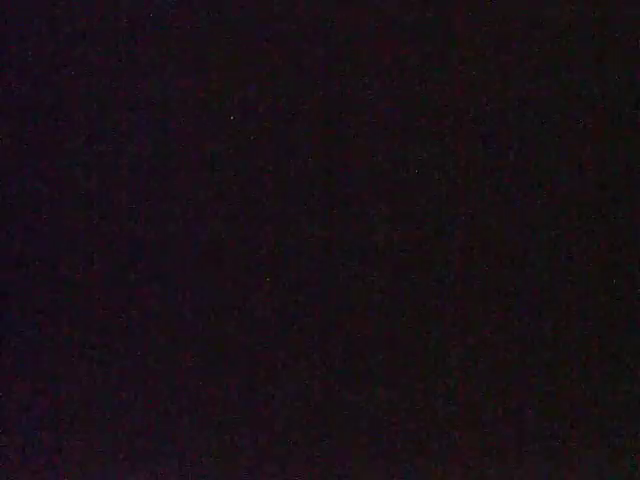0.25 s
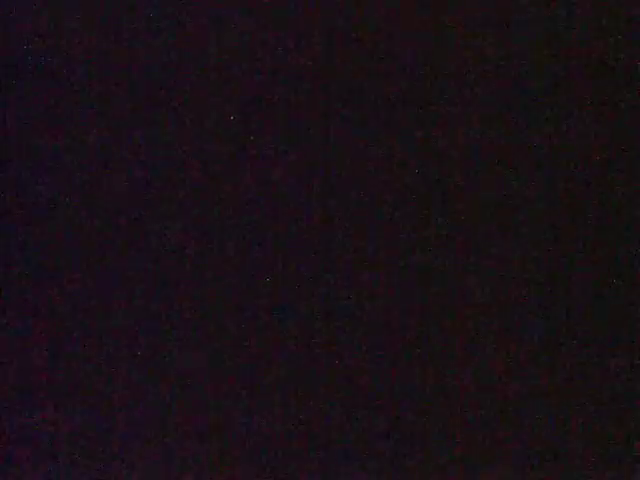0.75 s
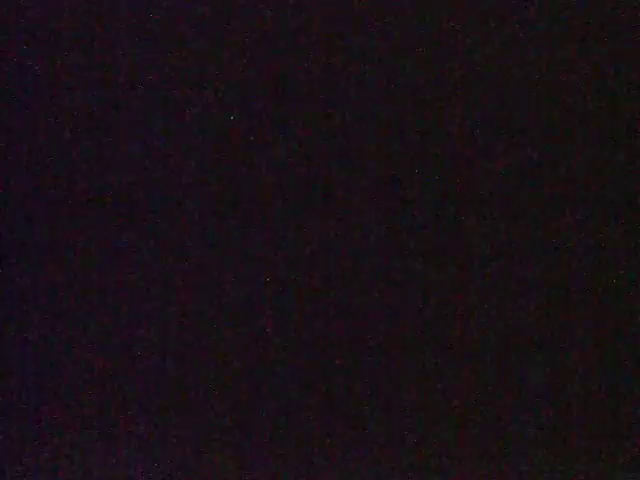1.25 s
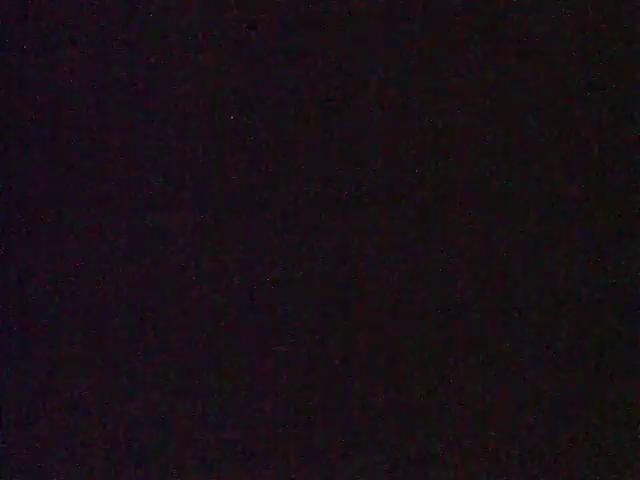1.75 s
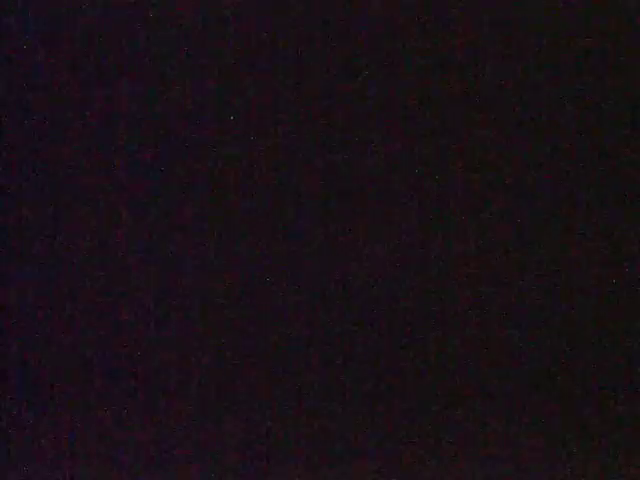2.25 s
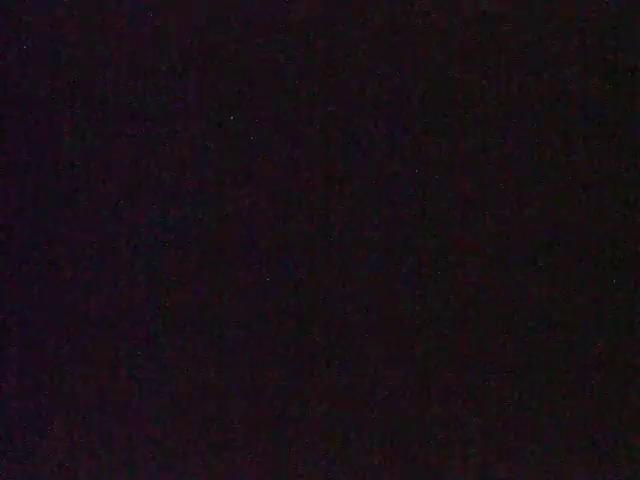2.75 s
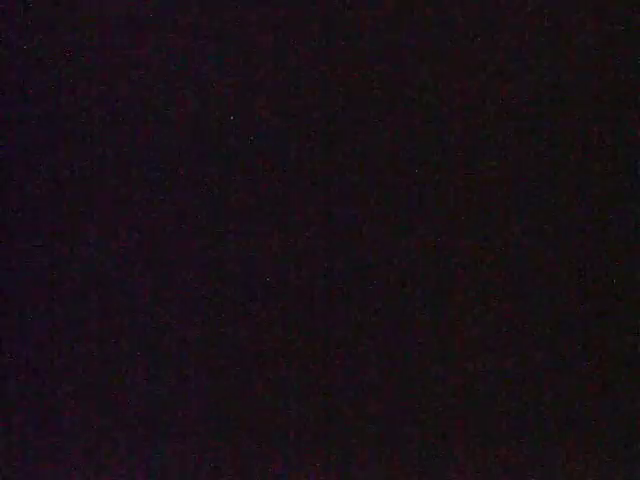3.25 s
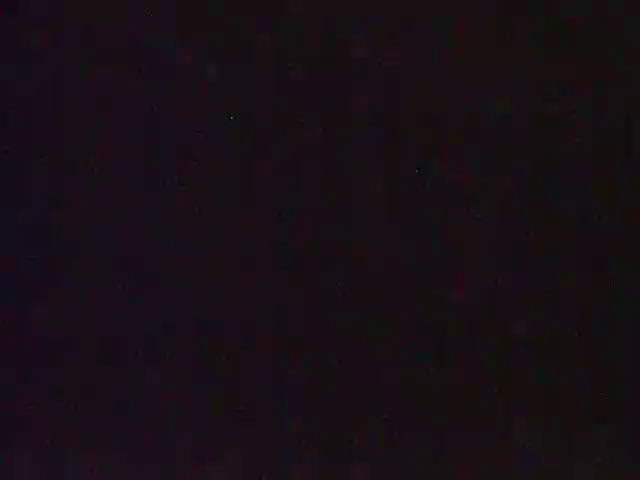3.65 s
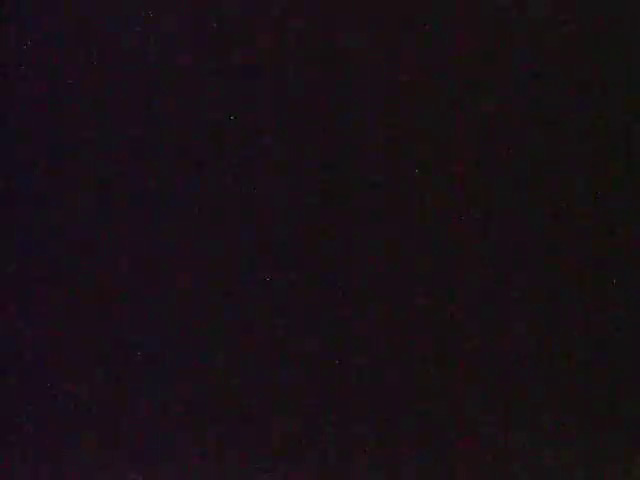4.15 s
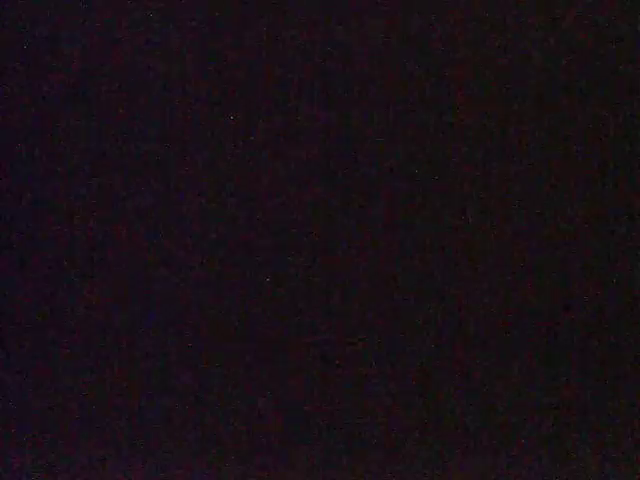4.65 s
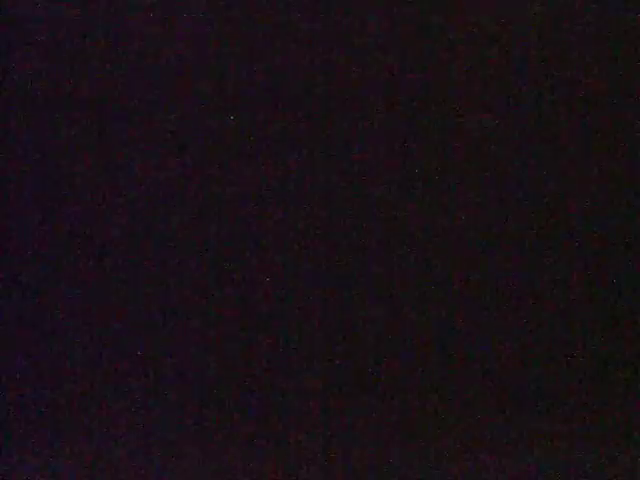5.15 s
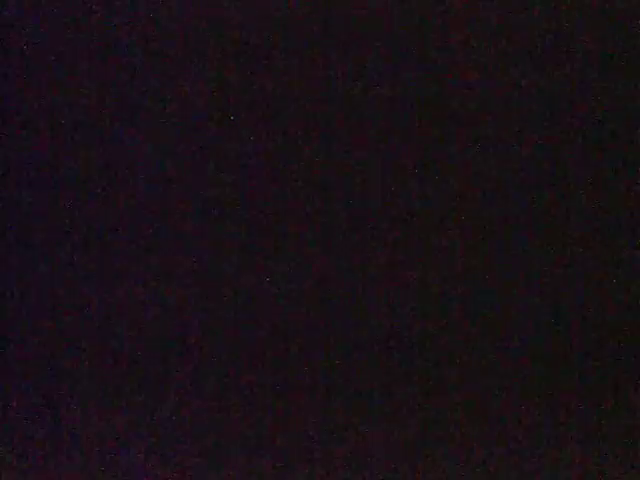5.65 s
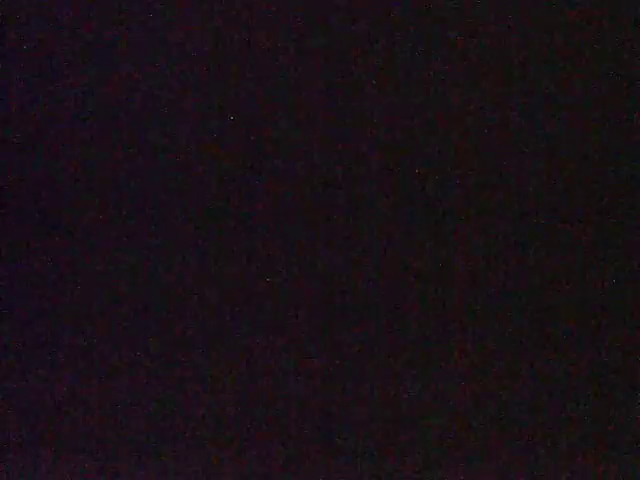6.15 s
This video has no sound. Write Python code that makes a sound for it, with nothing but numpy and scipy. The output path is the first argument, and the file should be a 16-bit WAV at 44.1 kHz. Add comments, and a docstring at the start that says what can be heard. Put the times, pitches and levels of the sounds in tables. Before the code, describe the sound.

Tree frogs whistle two-note calls over a distant night chorus and insect buzz, while fingers rub and click on the recorder's plastic case.

```python
"""Tree frogs whistle through the night: one close by gives a low note, then a high one, over a far crowd
among leaves, buzzing insects and a soft rumble. From half a second in, fingers rub the plastic case of a
handheld recorder; soon they bump and click on it too, ringing its modes, busiest from 2 to 4 s. Near 5 s a
far hum swells and the sharpest click overloads the converter. A last rub and a few clicks come around 6 s."""
import sys
import numpy as np
from scipy import signal
from scipy.fft import rfft, irfft, next_fast_len
from scipy.io import wavfile
from scipy.ndimage import uniform_filter1d

SR = 44100
rng = np.random.default_rng(int(sys.argv[2]) if len(sys.argv) > 2 else 0)


def int16_out(signal):
    """Quantize to a 16-bit WAV file."""
    q = np.round(np.clip(np.atleast_2d(signal).T, -1, 1) * 32767)
    wavfile.write(sys.argv[1], SR, q.astype(np.int16))


N = 282945

# The lead frog's calls. Each row: start in seconds, low note level in dB, high note level in dB,
# swell of the high note in dB, its length in seconds.
NEAR_CALLS = [(-.172, -30, -29, 3.5, 0.12), (.595, -30, -29, 1.5, 0.14), (1.441, -28.5, -36, 3, 0.16),
              (2.228, -30, -41.5, 17.5, 0.15), (3.109, -35, -31, 1.5, 0.14), (3.913, -33, -38, 8.5, 0.14),
              (4.694, -51, -31.5, -8, .15), (5.479, -41.5, -32.5, -9.5, 0.15), (6.357, -38, -38, 0, .16)]
# Frogs behind the leaves. Each row: start and length in seconds, pitch and rise in Hz, level in dB.
HIDDEN_NOTES = [(.019, .114, 3671, 0, -41), (.087, .126, 3757, 0, -43), (.145, .137, 3681, -15, -47),
                (.392, .08, 2031, 0, -45), (.398, .111, 3940, 0, -43), (.505, .094, 3718, 0, -47),
                (.577, .123, 3738, 0, -45), (.632, .087, 3900, 150, -44), (.836, .1, 3656, 0, -43),
                (1.077, .08, 2000, 28, -45), (1.138, .259, 3763, 12, -43), (1.207, .14, 3653, 0, -45),
                (1.44, .105, 3939, 13, -46), (1.651, .063, 2002, 19, -47), (1.663, .19, 3529, 0, -41),
                (1.738, .187, 3664, 0, -43), (1.762, .108, 3940, -11, -45), (1.797, .086, 2028, 0, -44),
                (2.144, .161, 3765, 0, -40), (2.223, .094, 3568, 0, -46), (2.615, .158, 3650, 14, -44),
                (2.712, .177, 3928, 0, -47), (2.922, .197, 3920, 20, -48), (2.766, .105, 3607, 19, -47),
                (3.108, .161, 3768, 0, -43), (3.434, .117, 3454, 30, -42), (3.439, .329, 3602, 64, -44),
                (3.451, .069, 2024, 10, -44), (3.512, .172, 3735, 0, -45), (3.674, .105, 3923, -15, -47),
                (3.805, .102, 3743, 0, -44), (3.942, .097, 3900, 130, -49), (4.121, .137, 3775, 0, -46),
                (4.255, .091, 3787, -15, -47), (4.461, .187, 3656, 0, -45), (4.5, .11, 2790, -40, -56),
                (5.34, .08, 2830, -70, -57), (4.638, .187, 3524, 24, -47), (4.712, .097, 3880, 20, -49),
                (5.076, .161, 3785, 0, -46), (5.242, .112, 2030, 0, -50), (5.448, .108, 3666, 0, -46),
                (5.596, .123, 3545, 16, -47), (5.904, .149, 3786, 9, -45), (6.319, .123, 3660, 0, -43)]
# Clicks and bumps. Each row: start in seconds, thud peak in dB, ring peak in dB, strongest pitch in
# octaves above 1 kHz, fall away from that pitch in dB per octave, crack decay time in milliseconds.
CASE_HITS = [(1.2185, -47, -26, 3, 14, 5), (1.2922, -46, -35, 2.5, 8, 1.9),
             (2.2816, -23.5, -16, 0.6, 22, 0.86), (2.3682, -30, -37, -4, -1.5, .6),
             (2.384, -32, -24, -1.2, 21, 0.88), (2.447, -30.5, -25, 0.5, 18, 0.54),
             (2.4711, -16, -26, 0.6, 4.5, 0.65), (2.5223, -30.5, -4, 2.5, 9, 0.3),
             (2.8852, -30.5, -4.5, 0.83, 7, 1.4), (3.3644, -11.5, -17.5, 0.5, 0, 2.65),
             (3.7029, -23, -29.5, 0, 4, 0.68), (3.8489, -31, -21, 1.1, 7.5, 0.41),
             (3.8599, -36.5, -11, 1.5, 6, 1.3), (3.8834, -54, -30, 1.0, 6, .6),
             (4.14, -54, -20, 2.16, 4.5, 1.1), (4.16, -52, -20, 4, 8, 3.2),
             (4.3391, -53, -10.5, 0.93, 6.5, 0.12), (4.3673, -50, -18.5, 4.5, 5, 8),
             (4.8906, -22, 0, 1.69, 10, 0.11), (4.9319, -51, -30.5, 2.2, 5, 4.3),
             (5.1473, -40, -32.5, 3.5, 0, 0.3), (5.5073, -43, -20.5, 2.5, 7.5, 0.12),
             (6.064, -33, -34, 1.3, 6, 2.5), (6.1204, -32, -22, 6, 2.5, 0.9),
             (6.133, -57, -37, 2.5, 2, 1.7), (6.202, -47, -20, 3, 12, 0.86),
             (6.241, -58, -15.5, 2, 16, 2.3), (6.3042, -52, -18.5, 3, 11.5, 5.3)]
# Modes of the case, grouped as thud, knock, clack, rap, crack, snap, tap and tick.
# Each row: pitch in Hz, level within the group in dB, time to fall 60 dB in seconds.
CASE_MODES = [
    [(111, -16.5, 0.041), (235, 4.5, 0.021), (320, -11, 0.034)],
    [(654, 0, 0.023)],
    [(1074, 2.5, 0.022), (1292, 8.5, 0.014)],
    [(1654, 0, 0.006)],
    [(2120, 0, 0.0044)],
    [(2887, 0, 0.0052)],
    [(3750, 2, 0.0057), (4290, -2, 0.0068)],
    [(5760, -1.5, 0.0033), (6450, -4, 0.0031), (7000, -10.5, 0.012)],
]
# How readily each group from knock to tick answers a blow, in dB.
MODE_RESPONSE_DB = [0, 3, -0.5, -2, -1, -4.5, 5]
# Finger slides, one curve per rub. Each row: time in seconds, level in dB, then the low ring and
# the treble against that level in dB.
RUB_CURVES = [
    [(.43, -64, 19, -7), (.486, -49.5, 5.5, 2.5), (.53, -53.5, 7, 1), (.56, -60, 23, 3)],
    [(.6, -61, 18, -7), (.678, -45.5, -3, 3.5), (.72, -48.5, 9.5, 4.5), (.784, -67.5, 18.5, 4),
     (.912, -54.5, 10, 2.5), (.95, -66, 3, -2)],
    [(.93, -63, -2, -3), (.996, -49, 5.5, -0.5), (1.052, -46.5, -1, -1), (1.194, -50, -3, -6),
     (1.25, -59, 5.5, 1), (1.296, -48, 5.5, -4), (1.33, -60, 15, -6)],
    [(1.33, -56, 11, -5), (1.412, -52.5, 12, 0), (1.494, -37.5, 3.5, -1.5), (1.578, -42, 5, 0.5),
     (1.7, -47.5, 13.5, 3.5), (1.716, -40.5, 3, 2), (1.848, -41.5, 0.5, -6), (1.954, -41, -5, -8),
     (2.02, -54, 11, -9)],
    [(2.19, -57.5, 1, -7), (2.242, -39.5, 3.5, -8), (2.288, -40.5, 16.5, 1), (2.314, -37.5, -4, -5.5),
     (2.416, -52, 13.5, 0), (2.45, -71, 14, -4)],
    [(2.906, -69, 20, -8), (2.938, -62, 22.5, -14), (2.988, -75, 25, -7)],
    [(3.12, -67.5, 27, 2), (3.186, -43, 12, -4), (3.24, -56, 4, -11)],
    [(3.26, -52, 1, -8), (3.302, -41.5, 3.5, -6), (3.348, -37.5, -11, 3.5), (3.394, -39, -9, 0.5),
     (3.458, -37, -10, 2), (3.508, -52, 14.5, 4.5), (3.64, -50, -7, -10), (3.68, -64, 10, 8)],
    [(3.76, -65, 5, 9), (3.796, -47, -4, -2.5), (3.84, -48, 3, -11)],
    [(4.91, -78, 0, -2), (4.93, -44, 8, 9), (4.954, -50, 5, 3), (4.97, -56, 11, -6)],
    [(6.045, -82, 8, -8), (6.06, -58, 14, -10), (6.092, -66, 9, 2), (6.13, -37.5, 6.5, -6),
     (6.15, -72, 4, -6)],
]
# Resonances a rub brings out, grouped as low ring, body, low middle, middle and treble.
# Each row: centre in Hz, width in Hz, level within the group in dB.
RUB_BANDS = [
    [(305, 197, -11), (641, 676, 7)],
    [(1264, 1060, 0)],
    [(2390, 590, 0)],
    [(2826, 980, 8), (3840, 580, -15.5)],
    [(6320, 2080, 9.5), (7170, 1200, 9.5)],
]
# A far frog's two notes. Each row: pitch in Hz, its spread in Hz, length in seconds, relative level in dB.
CROWD_CALL = [(2000, 73.1, .075, -4.5), (3661, 170, 0.101, -2)]
# Fader ride of the far crowd. Each row: time in seconds, level in dB.
CROWD_FADER = [(0, -41), (.23, -41), (.77, -42.5), (1.05, -43.5), (1.6, -40), (2.14, -40.5), (2.9, -45.5),
               (3.4, -42.5), (3.84, -44), (4.23, -43), (4.75, -44.5), (5.0, -47.5), (5.65, -46.5),
               (6.42, -45)]
# Fader ride of the insect buzz. Each row: time in seconds, level in dB.
BUZZ_FADER = [(0, -48), (.44, -49.5), (1.4, -54), (2.05, -52.5), (3.0, -54), (3.7, -53), (4.4, -56.5),
              (5.04, -48), (5.53, -50.5), (5.95, -45), (6.42, -45.5)]
# Cricket pips. Each row: start in seconds, peak in dB.
CRICKET_PIPS = [(.731, -37), (.75, -43), (.76, -49), (.807, -41), (2.819, -50), (2.846, -48), (4.98, -47.5),
                (4.99, -45)]
# Fader ride of a far, engine-like hum. Each row: time in seconds, level in dB.
HUM_FADER = [(0, -49.5), (.75, -51.5), (2.159, -56.5), (2.43, -46.5), (2.79, -55.5), (3.5, -55.5),
             (3.86, -45.5), (4.3, -51), (4.55, -55), (4.77, -42.5), (5.16, -54), (6.42, -57)]
# Tone curve of the rumble and air. Each row: frequency in Hz, relative level in dB.
AIR_SPECTRUM = [(12, -35), (22, -1), (86, -6), (250, -11.5), (650, -15.5), (950, -13.5), (1500, -20.5),
                (2600, -27), (4500, -27), (6200, -26.5), (7800, -22), (9200, -32)]


def near_frogs():
    """The lead frog sings a steady low note, then a scooped high one; notes from behind leaves flutter."""
    low_hz, high_hz, sag_hz, high_delay_s = 1950, 3636, 17, .097
    low, high, hidden = np.zeros((3, N))
    for start, low_db, high_db, swell_db, length in NEAR_CALLS:
        low_phase, high_phase = 2 * np.pi * rng.random(2)
        add(low, start, whistle(.086, low_hz, low_db, low_phase, swell_db=-2))
        note = whistle(length, high_hz, high_db, high_phase, -sag_hz, swell_db, scoop=.045)
        add(high, start + high_delay_s, note)
    for start, length, hz, rise_hz, db in HIDDEN_NOTES:
        phase = 2 * np.pi * rng.random()
        add(hidden, start, whistle(length, hz, db, phase, rise_hz, scoop=.008, blur_s=.02))
    hidden *= undb(2.2 * walk(55) - 1.3)
    high *= undb(2.8 * walk(35) - 2.5)
    low *= undb(1.8 * walk(40) + .8)
    voices = low + high + hidden
    return voices + undb(-11) * foliage(voices, t60=.63)


def whistle(length, hz, db, phase, rise_hz=0, swell_db=0, scoop=0, blur_s=0):
    """A frog's near-sine note: a scoop bends it up into pitch and down again; distance blurs its edges."""
    t = np.arange(int(length * SR)) / SR
    progress, remaining = t / t[-1], t[-1] - t
    bend = 1 - 1.2 * scoop * np.exp(-t / .008) - 1.6 * scoop * np.exp(-remaining / .012)
    pitch = (hz + rise_hz * progress) * bend
    attack = np.minimum(1, t / (.005 + blur_s + .25 * scoop))
    release = np.minimum(1, remaining / (.008 + blur_s + .4 * scoop))
    tone = np.sqrt(2) * np.sin(2 * np.pi * np.cumsum(pitch) / SR + phase)
    return undb(db + swell_db * progress) * attack * release * tone


def case_clicks():
    """A finger's blow is a short ragged crack that rings the case: a low thud under a brighter ring."""
    out, t = np.zeros(N), np.arange(SR // 12) / SR
    rings = []
    for group in CASE_MODES:
        ring = sum(undb(db - 60 * t / t60) * np.sin(2 * np.pi * hz * t) for hz, db, t60 in group)
        # each group is high-passed so it gives out little below its lowest mode
        low_cut = signal.butter(2, .77 * group[0][0], "high", fs=SR, output="sos")
        rings.append(signal.sosfilt(low_cut, ring))
    octaves = np.log2([group[0][0] / 1000 for group in CASE_MODES[1:]])
    for start, thud_db, ring_db, centre, fall_db, crack_ms in CASE_HITS:
        crack = .25 * rng.standard_normal(600) * np.exp(-1000 * t[:600] / crack_ms)
        crack[0] = -2  # the spike of first contact
        ring_peaks = ring_db + np.array(MODE_RESPONSE_DB) - fall_db * np.abs(octaves - centre)
        for k, (db, ring) in enumerate(zip([thud_db, *ring_peaks], rings)):
            struck = np.convolve(ring, crack)
            add(out, start, (-1) ** k * undb(db) * struck / np.abs(struck).max())
    return out


def finger_rubs():
    """Skin slips in dense, uneven grains that excite the resonances of the case."""
    firm_db, fade_s = -46, .013
    grains = rng.standard_normal(N) * undb(.84 * walk(500) + .5 * walk(49))
    layers = [unit(sum(undb(db) * band(grains, hz, width) for hz, width, db in group))
              for group in RUB_BANDS]
    out = np.zeros(N)
    for curve in RUB_CURVES:
        times, *columns = np.transpose(curve)
        span = np.arange(int(times[0] * SR), int(times[-1] * SR))
        t = span / SR
        db, low_db, treble_db = (np.interp(t, times, column) for column in columns)
        # body and low middle follow the low ring, and fall back as the finger presses harder
        press_db = np.maximum(db - firm_db, -6)
        body_db = .24 * low_db - .25 * press_db + 1.7
        low_middle_db = .45 * low_db - .2 * press_db - 1.2
        gains_db = [low_db, body_db, low_middle_db, 3, treble_db + 7.5]
        scrape = sum(undb(gain) * layer[span] for gain, layer in zip(gains_db, layers))
        touch = np.clip(np.minimum(t - times[0], times[-1] - t) / fade_s, 0, 1)
        out[span] += touch * undb(db) * scrape
    return out


def far_frogs(count):
    """A crowd calls at chance moments and distances, heard mostly through echoes."""
    bushes, gap_s = np.zeros((4, N)), .027
    callers = np.hstack([rng.random((count, 2)), rng.standard_normal((count, 3))])
    for k, (when, turn, detune, nearness, slide) in enumerate(callers):
        start = when * (N / SR + .4) - .3
        for hz, spread, length, db in CROWD_CALL:
            pitch = hz + spread * detune
            level_db = db + 1.5 * nearness - 1.3 * detune ** 2
            rise_hz = pitch * (.008 + .012 * slide)
            note = whistle(length, pitch, level_db, 2 * np.pi * turn, rise_hz, scoop=.016, blur_s=.0083)
            add(bushes[k % 4], start, note)
            start += length + gap_s
    # moving leaves make the callers of each bush flutter together
    chorus = sum(bush * undb(4 * walk(130)) for bush in bushes)
    return unit(.4 * chorus + foliage(chorus, t60=.6)) * fader(CROWD_FADER, trim_db=.06)


def foliage(x, t60):
    """Leaves and trunks scatter a call into a soft tail of echoes."""
    t = np.arange(SR // 2) / SR
    tail = rng.standard_normal(len(t)) * undb(-60 * t / t60) * np.minimum(1, t / .01)
    return signal.fftconvolve(x, tail / np.linalg.norm(tail))[:N]


def insects():
    """Dense wing strokes ring a broad resonance and throb unevenly; one cricket adds short pips."""
    strokes = rng.standard_normal(N) * undb(.93 * walk(220) + 1.1 * walk(30))
    buzz = unit(band(band(strokes, hz=6950, width=910), hz=7200, width=1100))
    out = buzz * fader(BUZZ_FADER, trim_db=2.5)
    t = np.arange(int(.0071 * SR)) / SR
    pip = np.hanning(len(t)) * np.sin(2 * np.pi * 5000 * t)
    for start, db in CRICKET_PIPS:
        add(out, start, undb(db) * pip)
    return out


def far_hum():
    """A rough, engine-like hum and its octave swell in the bass."""
    root = unit(band(rng.standard_normal(N), hz=79.9, width=15))
    octave = unit(band(rng.standard_normal(N), hz=158, width=12))
    return (root + undb(-6) * octave) * fader(HUM_FADER, trim_db=1.5)


def night_air():
    """A gently wavering bed of distant rumble and faint hiss."""
    hz, db = np.transpose(AIR_SPECTRUM)
    size = next_fast_len(N)
    bins_hz = np.maximum(np.arange(size // 2 + 1) * SR / size, 1)
    colour = undb(np.interp(np.log(bins_hz), np.log(hz), db))
    air = irfft(rfft(rng.standard_normal(size)) * colour, size)[:N]
    return unit(air) * undb(-45 + walk(5.7) / 2)


def undb(db):
    """Decibels to gain."""
    return 10 ** (np.asarray(db) / 20)


def unit(x):
    """Scales x to an RMS of 1."""
    return x / np.sqrt(np.mean(x ** 2))


def fader(points, trim_db):
    """A gain that rides through points of seconds and dB, plus a trim."""
    return undb(np.interp(np.arange(N) / SR, *np.transpose(points)) + trim_db)


def band(x, hz, width):
    """A resonance applied twice."""
    b, a = signal.iirpeak(hz, hz / width, fs=SR)
    return signal.lfilter(b, a, signal.lfilter(b, a, x))


def walk(rate):
    """A smooth wobble: random levels held for 1 / rate seconds and slewed twice."""
    hold = int(SR / rate)
    steps = np.repeat(rng.standard_normal(N // hold + 1), hold)
    return 1.72 * uniform_filter1d(uniform_filter1d(steps, hold), hold)[:N]


def add(out, start, x):
    """Mixes x into out from start seconds."""
    i = int(start * SR)
    x, i = x[max(-i, 0):], min(max(i, 0), len(out))
    out[i:i + len(x)] += x[:len(out) - i]


def scene():
    """The mono mix: the night outdoors, with handling noise up close."""
    outdoors = near_frogs() + far_frogs(count=900) + insects() + night_air() + far_hum()
    return (outdoors + finger_rubs() + case_clicks())[None]


def record(dry):
    """The microphone path dulls the top; gain control ducks after loud peaks; overload splashes treble."""
    mic_hz, converter_hz, top_hz = 7084, 8900, 16400
    threshold_db, duck_share, release_db_per_s, lag_samples = -4, .56, 16, 200
    dc_offset, ceiling = -.0026, .68
    dull = signal.sosfilt(signal.butter(6, mic_hz, fs=SR, output="sos"), dry)
    dull = signal.sosfilt(signal.ellip(10, .3, 80, converter_hz, fs=SR, output="sos"), dull)
    # the held peak sinks at a steady rate; the gain follows it a few milliseconds late
    level_db = 20 * np.log10(np.abs(dull) + 1e-9)
    sink_db = release_db_per_s * np.arange(N) / SR
    peak_db = np.maximum.accumulate(level_db + sink_db, axis=-1) - sink_db
    over_db = np.maximum(peak_db - threshold_db, 0)
    duck_db = signal.lfilter([1 / lag_samples], [1, 1 / lag_samples - 1], duck_share * over_db)
    clipped = np.clip(dull * undb(-duck_db) + dc_offset, -ceiling, ceiling)
    return signal.sosfilt(signal.ellip(10, .1, 80, top_hz, fs=SR, output="sos"), clipped)


dry = scene()
out = record(dry)
int16_out(out)
```